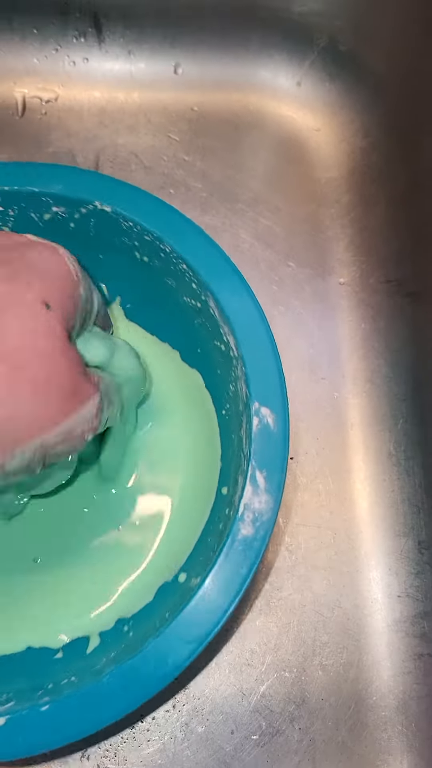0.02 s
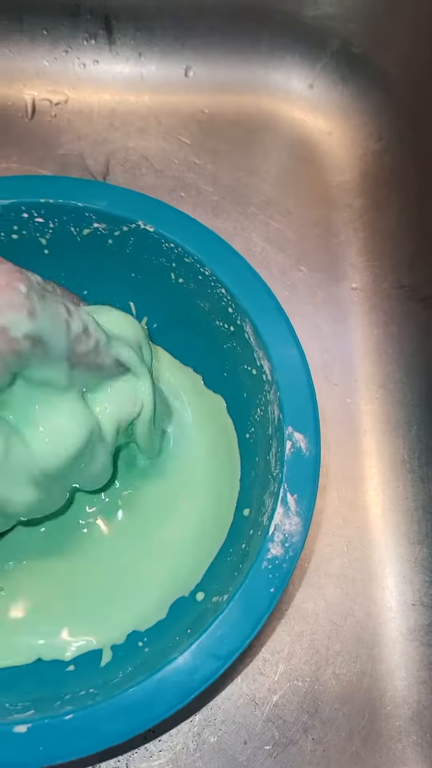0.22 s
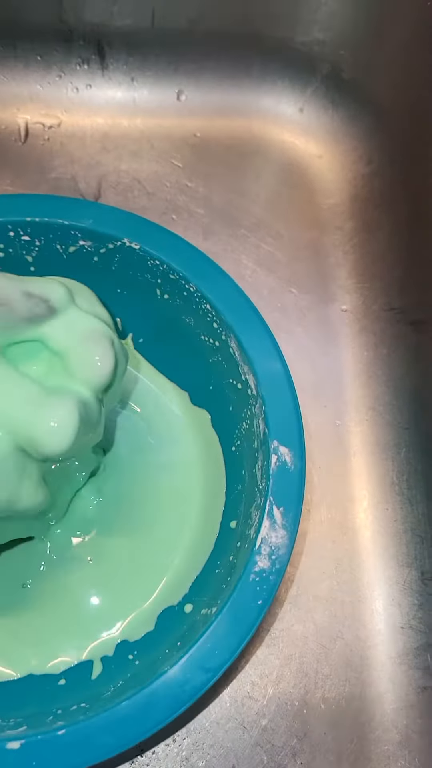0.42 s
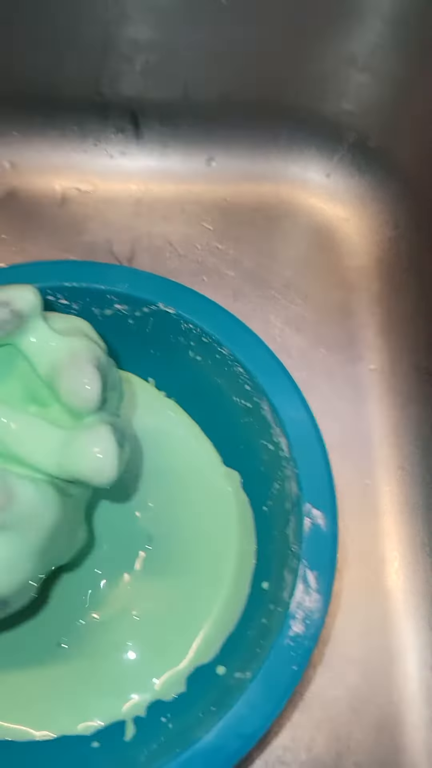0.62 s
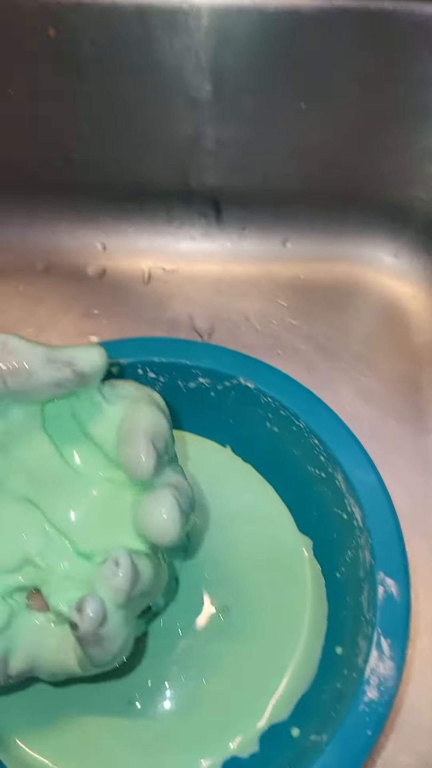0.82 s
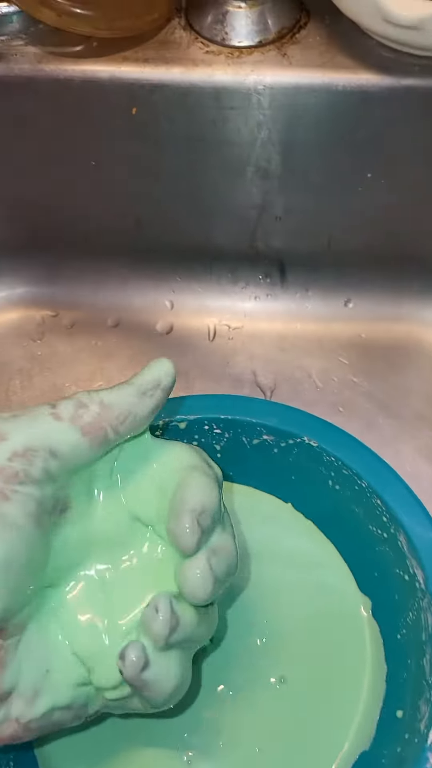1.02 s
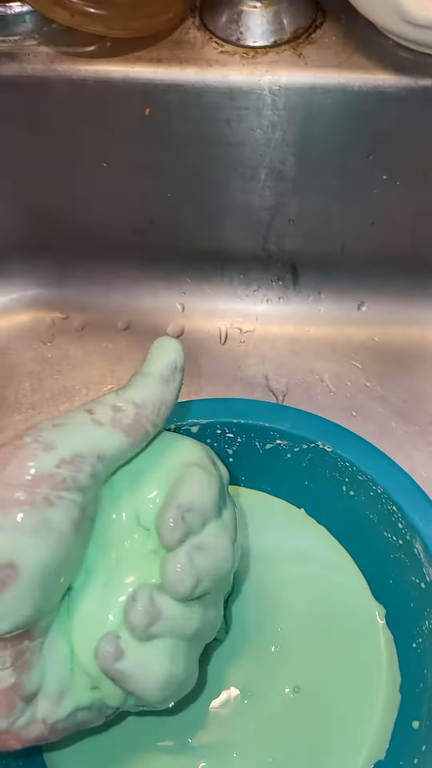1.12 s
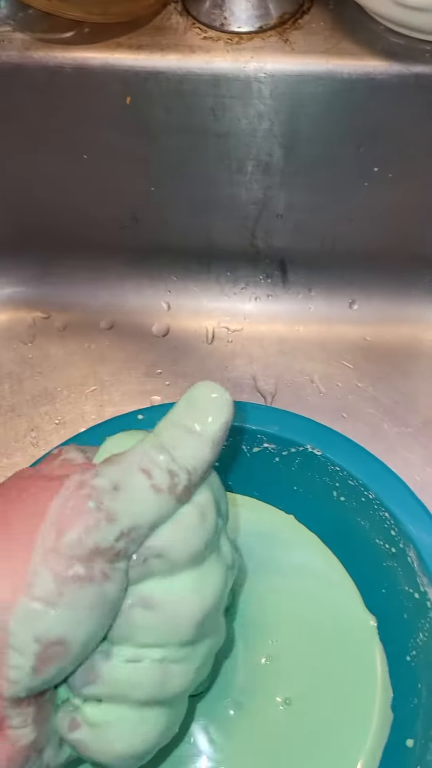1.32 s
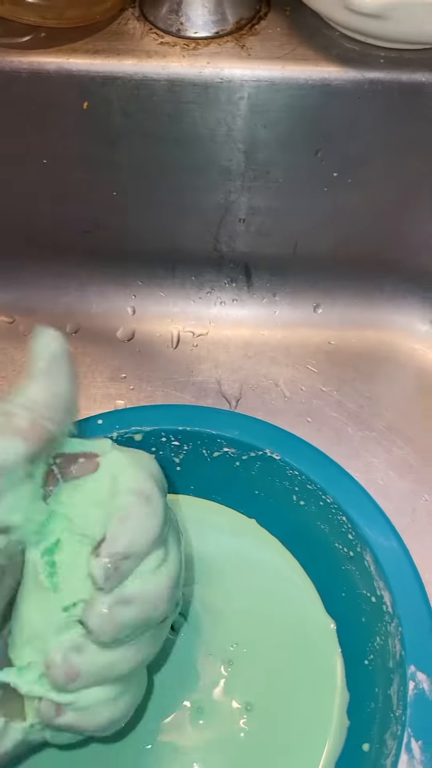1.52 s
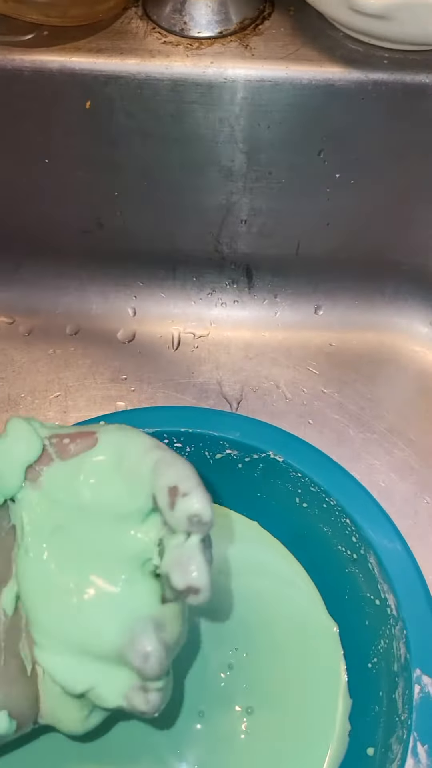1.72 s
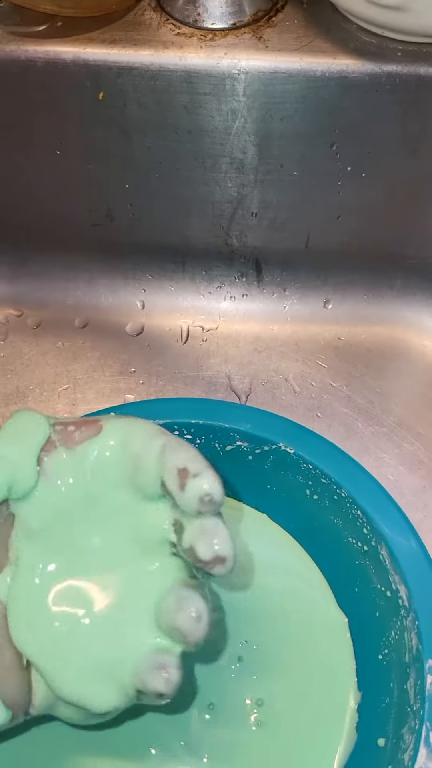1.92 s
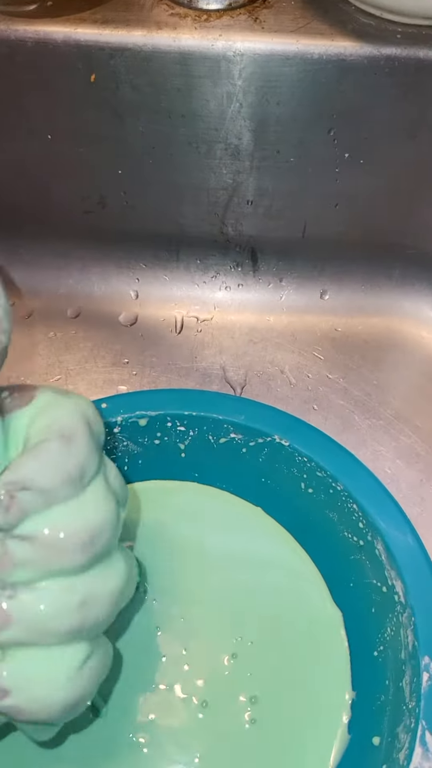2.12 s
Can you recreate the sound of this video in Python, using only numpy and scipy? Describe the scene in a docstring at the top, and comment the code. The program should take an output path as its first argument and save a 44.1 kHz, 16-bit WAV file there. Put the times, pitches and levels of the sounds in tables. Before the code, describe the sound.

Plastic bowl knocks and booms loudly in a metal sink, followed by small wet slurry snaps.

```python
"""A plastic bowl of thick slurry bumps and chatters to rest in a steel sink: short noise bursts make its cracks,
rattle and echo, and decaying tones ring the bowl and boom in the sink. Then fingers squeeze the slurry, where
films tear and air pops: noise bursts make the snaps, random clicks the crackle, and smooth swells of noise the
slides. A quiet kitchen of coloured noise hums behind. A phone with two microphone ports is held close above."""
import sys
import numpy as np
from scipy import signal
from scipy.fft import rfft, irfft
from scipy.io import wavfile

SR = 44100
rng = np.random.default_rng(int(sys.argv[2]) if len(sys.argv) > 2 else 0)


def gain_from_db(level_db):
    """Turn a decibel level (scalar or array-like) into a linear amplitude factor."""
    decades = np.asarray(level_db, float) / 20
    return 10 ** decades


def output_pcm(signal):
    """Save a mono or channel-first signal as 16-bit PCM at the path in sys.argv[1].

    Samples are clipped to [-1, 1] before scaling.
    """
    pcm = np.clip(np.atleast_2d(signal).T, -1, 1) * 32767
    wavfile.write(sys.argv[1], SR, np.round(pcm).astype(np.int16))


N = 97020  # length in samples, 2.2 s
HZ = np.maximum(np.fft.rfftfreq(N, 1 / SR), 1)
T = np.arange(N) / SR

# colour of the kitchen's hum and hiss (f/Hz, level/dB)
KITCHEN_COLOUR = [(15, -52), (25, -31), (43, 3), (124, -3.5), (143, 0), (226, 2), (282, -8), (314, -13),
                  (360, -11), (485, -8), (883, -30), (958, -30), (1740, -39), (2840, -33.5), (3090, -41.5),
                  (5170, -34), (10800, -52), (15000, -33), (16700, -44.5)]
# slow swell of the hum (t/s, level/dB)
HUM_SWELL = [(0, 2.5), (.5, 0.5), (1, -6.5), (1.5, -1.5), (1.9, -0.5), (2.2, 2)]
# faint narrow whines of an appliance (f/Hz, width/Hz, level/dB)
WHINES = [(2700, 270, -87), (7750, 150, -92.5)]
# snaps in the slurry (t/s, treble level/dB, pop level against treble/dB, t60/s)
SNAPS = [(.598, -51.5, -12, 0.03), (.691, -49.5, -8.5, 0.044), (0.72, -38.5, -15.5, .04),
         (0.764, -58, -6, 0.025), (.82, -55, -12, 0.015), (1.222, -52, -12, 0.017),
         (1.368, -44, 4.5, 0.011), (1.46, -48, -7.5, 0.035), (1.487, -44.5, -9, 0.013),
         (1.490, -34.5, -21, 0.021), (1.521, -31, -13.5, .015), (1.545, -34, -8.5, 0.025),
         (1.553, -25.5, -10.5, .012), (1.555, -25.5, -17, 0.014), (1.557, -31.5, -11, .015),
         (1.562, -40, 2, .04), (1.585, -39.5, -10, 0.012), (1.619, -37, -13.5, 0.01526),
         (1.691, -50.5, -9, 0.012), (1.695, -37.5, -16, 0.023), (1.698, -37, -0.5, 0.018),
         (1.753, -56.5, -0.5, 0.042), (1.963, -52.5, -16.5, 0.034), (2.071, -58, -5.5, .02),
         (2.083, -65.5, -8.5, 0.031), (2.098, -51.5, -7, .02), (2.132, -45.5, -10, .02),
         (2.150, -52, -4, 0.014), (2.168, -39.5, 14.5, 0.033)]
# strength of the fine crackle as the fingers squeeze (t/s, level/dB)
SQUEEZE = [(0.5, -80), (0.702, -75), (1.058, -91), (1.27, -89), (1.546, -68), (1.616, -65.5),
           (1.854, -77.5), (2.2, -80.5)]
# soft wet slides of the palm (start t/s, length/s, level/dB, centre f/Hz)
SLIDES = [(.06, 0.057, -66, 4500), (0.571, .06, -70, 15000), (0.795, .11, -66.5, 3500),
          (1.398, 0.15, -70.5, 1700), (1.539, 0.1, -66.5, 2400), (1.549, .09, -56.5, 14470)]
# bounces of the bowl (t/s, crack level/dB, bowl ring level/dB)
BOUNCES = [(0.193, -24, -25.5), (.242, -1.5, -6.5), (0.263, -32, -23.5), (.267, -7.5, -13.5),
           (.283, -28, -28.5), (.293, -7.5, -11.5), (0.319, -28.5, -21.5), (.345, -25.5, -28),
           (.362, -28, -24), (0.382, -19, -23), (0.409, -27.5, -32.5)]
# colour of the crack and rattle (f/Hz, level/dB)
CRACK_COLOUR = [(180, -23), (300, -8), (500, 0), (780, -11.5), (1290, -3), (1740, -13), (2440, -12),
                (4030, -17), (6140, -17.5), (8000, -27.5), (10500, -44.5), (15200, -32), (16500, -50)]
# tones of the bowl (f/Hz, level/dB, t60/s, factor whose sign is the first swing)
BOWL_MODES = [(359.1, -14, 0.34, 0.94), (444, -6, 0.045, -0.91), (489, -12.5, 0.35, 0.72),
              (575, -10, .12, -1), (615.4, -7, .08, 1), (684.7, -18, .35, -0.92), (887, -17.5, .15, -1.2),
              (936, -16.5, 0.099, 1), (1173, -12, .04, -1), (1310, 3, 0.025, 1), (1494, -9.5, .03, -0.66),
              (1652, -21, 0.021, 0.99), (2294, -15, .025, -1.4), (2742, -6, .025, 0.88)]
# tones of the sink (f/Hz, level/dB, t60/s, first swing +1 or -1)
SINK_MODES = [(59, -9, .13, -1), (81, -19, .45, 1), (101, 0, .09, 1), (137, -13, .13, -1),
              (146, -25, .45, 1), (195, -16, .07, -1), (227, -17, .21, -1), (269, -21, .14, -1)]
# the bowl's weight landing on the sink floor (t/s, level/dB)
THUDS = [(.018, -26.5), (0.064, -32), (0.193, -16), (0.2113, -8), (0.2428, 0), (0.263, -3), (0.2684, 5),
         (0.286, -13.5), (.292, 2), (0.3183, -12), (0.3473, -19), (0.3615, -12), (0.3818, -12.5),
         (0.4118, -18)]
# How the two ports hear each source, three lists each:
# (f/Hz, left minus right level/dB), (f/Hz, left phase lead/rad), (f/Hz, likeness 0-1)
ROOM_PORTS = [(60, 6.5), (110, 1), (200, 0.0), (380, -5.5), (700, -0.5), (1290, 6.5), (2380, -8),
              (4400, 0.5), (8120, -9.5), (15000, -6)], [(60, -.05), (600, -0.51)], [(60, 1), (130, 1),
              (290, .8), (640, .6), (1400, 0.12), (15000, .1)]
HAND_PORTS = [(60, -6), (110, -25), (200, -57), (380, -27), (700, 11), (1290, 8.5), (2380, 5), (4400, -5.5),
              (8120, 0), (15000, -12)], [(2000, -1.), (15000, -3.2)], [(2000, .4), (6000, .3),
              (15000, 0.18)]
BOWL_PORTS = ([(60, 0.05), (110, 0.02), (200, -0.5), (380, -2.5), (700, -0.5), (1290, 5.44), (2380, 0.5),
              (4400, -3.0), (8120, -5.0), (15000, -10.0)], [(60, -.1), (125, -.15), (250, -.5), (600, -1.7),
              (1300, -1.4), (3000, -1.5)], [(60, 1), (300, 0.95), (640, 0.9), (1400, 0.5), (3000, 0),
              (15000, 0.5)])


def on_hz(table):
    """Read a frequency table at every spectrum line, along a logarithmic frequency axis."""
    points = np.array(table, float)
    return np.interp(np.log(HZ), np.log(points[:, 0]), points[:, 1])


def over_time(table):
    """Turn a table of times and dB levels into a smooth gain."""
    return gain_from_db(np.interp(T, *np.array(table).T))


def unit(x):
    """Scale to rms 1."""
    return x / np.sqrt(np.mean(x ** 2))


def noise(gain):
    """Two unrelated steady noises of the same colour, together at rms 1."""
    return unit(irfft(rfft(rng.standard_normal((2, N))) * gain, N))


def shaped(envelope, gain):
    """Two unrelated noises follow an envelope, then get a colour; rms about 1 where the envelope is 1."""
    spectrum = rfft(envelope * rng.standard_normal((2, N)))
    return irfft(spectrum * gain / np.sqrt(np.mean(gain ** 2)), N)


def grains(depth_db):
    """A level that jumps at random about every 0.7 ms; rms 1."""
    steps = gain_from_db(depth_db * rng.standard_normal(N // 30 + 1))
    return unit(np.repeat(steps, 30)[:N])


def hump(hz, wide_hz):
    """Gain that peaks at one frequency and falls away on both sides, like a resonance."""
    return 1 / (1 + ((HZ - hz * hz / HZ) / wide_hz) ** 2)


def low_pass(hz, order):
    """Gain that keeps what lies below a frequency."""
    return 1 / (1 + (HZ / hz) ** order)


def fade(at_s, t60_s):
    """Sudden start, then a decay that falls 60 dB in t60."""
    return (T >= at_s) * gain_from_db(-60 * np.clip(T - at_s, 0, 3 * t60_s) / max(t60_s, .002))


def half_wave(start_s, length_s):
    """A smooth rise and fall, half a sine wave long."""
    return np.sin(np.pi * np.clip((T - start_s) / length_s, 0, 1))


def ring(modes, blows, push_s):
    """Each blow is a brief push that sets off all the decaying tones of a body."""
    force = sum(gain_from_db(db) * half_wave(s, push_s) / (push_s * SR) for s, db in blows)
    body = sum(swing * gain_from_db(db - 60 * T / t60) * np.sin(2 * np.pi * hz * T)
               for hz, db, t60, swing in modes)
    return signal.fftconvolve(force, body)[:N]


def ports(pair, how):
    """Each port hears its own level and phase, and the right mixes in a share of the second signal."""
    gap_db, lead_rad, like = (on_hz(table) for table in how)
    like = np.clip(like, 0, 1)
    first, second = rfft(pair)
    right = np.sqrt(like) * first + np.sqrt(1 - like) * second
    turn = gain_from_db(gap_db / 2) * np.exp(.5j * lead_rad)  # half the gap and lead goes to each port
    return irfft(np.array([first * turn, right / turn]), N)


def kitchen():
    """Steady noise gives a swelling low hum and a faint hiss; narrow bands of noise give the whines."""
    room = rfft(noise(gain_from_db(on_hz(KITCHEN_COLOUR)))) * gain_from_db(-53)
    low = low_pass(800, 4)
    hum = over_time(HUM_SWELL) * irfft(room * low, N)
    hiss = irfft(room * (1 - low), N)
    whines = sum(gain_from_db(db) * noise(hump(hz, wide)) for hz, wide, db in WHINES)
    return ports(hum + hiss + whines, ROOM_PORTS)


def slurry_colours():
    """Gains of the bright treble and of the pop, which has a weaker, lower body."""
    treble = hump(15000, 3500)
    pop = hump(6630, 4000) + gain_from_db(-20.5) * hump(2200, 3000)
    return treble, pop


def slurry_snaps():
    """Tearing films and popping air: noise with a sharp edge, a decay and a longer grainy tail."""
    edge_db, edge_t60_s = 6, .003
    tail_db, tail_t60_s = -12, 0.059
    grainy = grains(4)
    treble, pop = slurry_colours()
    treble_envelope, pop_envelope = 0, 0
    for at_s, db, pop_db, t60_s in SNAPS:
        edge = gain_from_db(edge_db) * fade(at_s, edge_t60_s)
        tail = gain_from_db(tail_db) * grainy * fade(at_s, tail_t60_s)
        snap = gain_from_db(db) * (edge + fade(at_s, t60_s) + tail)
        treble_envelope = treble_envelope + snap
        pop_envelope = pop_envelope + gain_from_db(pop_db) * snap
    return 0.36 * shaped(treble_envelope, treble) + .5 * shaped(pop_envelope, pop)


def slurry_crackle():
    """Random tiny clicks, each a short decay of noise, follow the squeeze."""
    clicks_per_s, spread_db = 2500, 3
    treble, pop = slurry_colours()
    clicks = (rng.random(N) < clicks_per_s / SR) * gain_from_db(spread_db * rng.exponential(size=N))
    grain = unit(signal.fftconvolve(clicks, fade(0, 0.0044)[:400])[:N])
    return gain_from_db(0.5) * shaped(grain * over_time(SQUEEZE), treble + gain_from_db(1.5) * pop)


def palm_slides():
    """Soft wet rubbing: bands of noise that rise and fall smoothly."""
    return sum(gain_from_db(db) * shaped(half_wave(start_s, length_s), hump(hz, 4500))
               for start_s, length_s, db, hz in SLIDES)


def slurry():
    """Squeezed slurry snaps and crackles while the palm slides softly."""
    return ports(slurry_snaps() + slurry_crackle() + palm_slides(), HAND_PORTS)


def sink_boom():
    """The bowl's weight pushes the sink floor for 3 ms at a time, and the steel booms."""
    return ring(SINK_MODES, THUDS, .003)


def bowl_ring():
    """Each bounce is a 0.4 ms push that rings the plastic bowl."""
    return ring(BOWL_MODES, [(s, ring_db) for s, _, ring_db in BOUNCES], .0004)


def bounce_envelope(t60_s, soft=0):
    """One decay for each bounce; a larger soft makes the quiet bounces quieter still."""
    return sum(gain_from_db(crack_db * (1 + soft)) * fade(s, t60_s) for s, crack_db, _ in BOUNCES)


def bounce_echo():
    """The kitchen answers each bounce with a faint, slow decay of mid-range noise."""
    return gain_from_db(-40) * shaped(bounce_envelope(0.39), hump(800, 1800))


def bounce_rattle():
    """A duller, grainy noise that outlasts each crack."""
    colour = gain_from_db(on_hz(CRACK_COLOUR)) * low_pass(6400, 8)
    return gain_from_db(-16) * shaped(grains(3) * bounce_envelope(.1), colour)


def bounce_crack():
    """Hard contact bursts into noise; the treble lasts longer and is weaker in soft bounces."""
    colour, low = gain_from_db(on_hz(CRACK_COLOUR)), low_pass(9000, 8)
    body = .5 * shaped(bounce_envelope(.022), colour * low)
    treble = gain_from_db(-22.5) * shaped(bounce_envelope(.04, soft=0.77), colour * (1 - low))
    return body + treble


def bowl():
    """The bowl cracks, rattles, echoes and rings as it bounces, and the sink booms under it."""
    contact = bounce_crack() + bounce_rattle() + bounce_echo()
    return ports(contact + bowl_ring() + sink_boom(), BOWL_PORTS)


def scene():
    """All sources at the two ports."""
    return kitchen() + slurry() + bowl()


def band_limit(x):
    """A steep low-pass at the top of the band."""
    return signal.sosfilt(signal.butter(12, 16820, fs=SR, output="sos"), x)


def record(dry):
    """The microphone cuts deep bass and the very top, then the phone rounds the loudest peaks."""
    bass_cut = signal.butter(2, 40, "high", fs=SR, output="sos")
    top_cut = signal.ellip(6, .5, 22, 15780, fs=SR, output="sos")
    mic = signal.sosfilt(top_cut, signal.sosfilt(bass_cut, dry))
    rounded = np.tanh(0.83 * mic) / 0.77
    return band_limit(rounded)


dry = scene()
out = record(dry)
output_pcm(out)
```